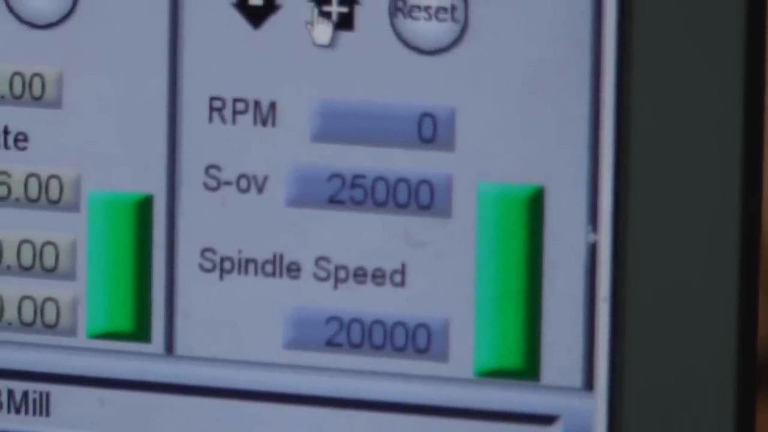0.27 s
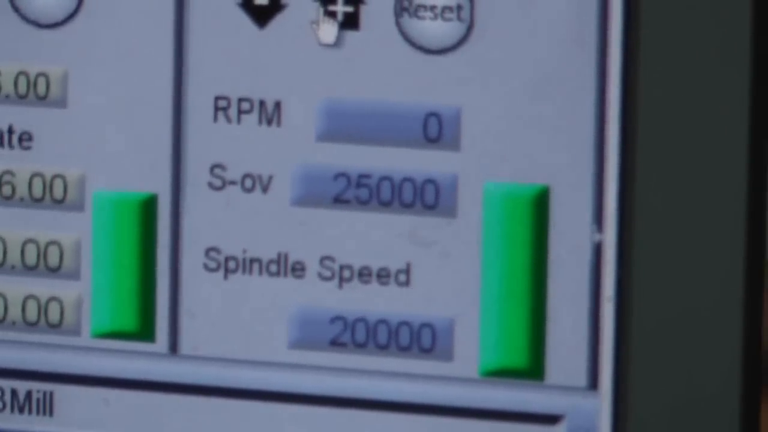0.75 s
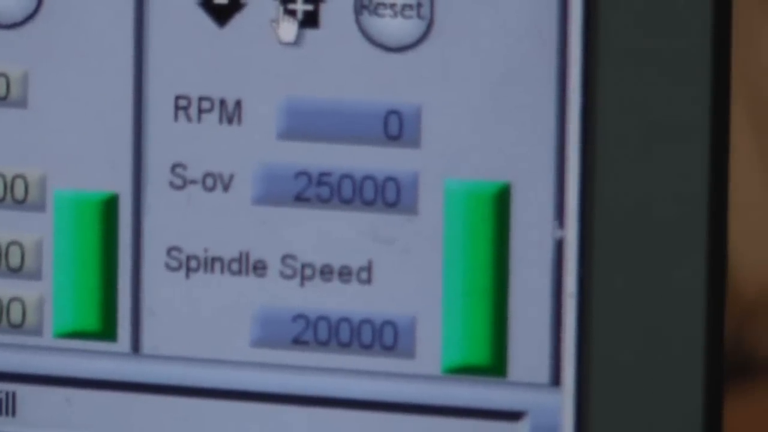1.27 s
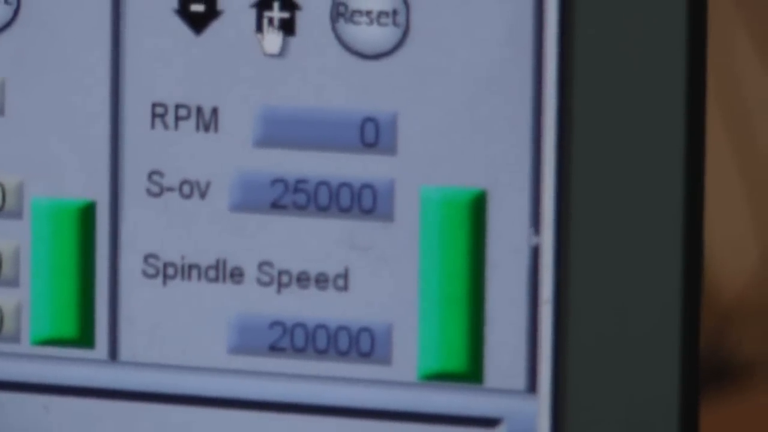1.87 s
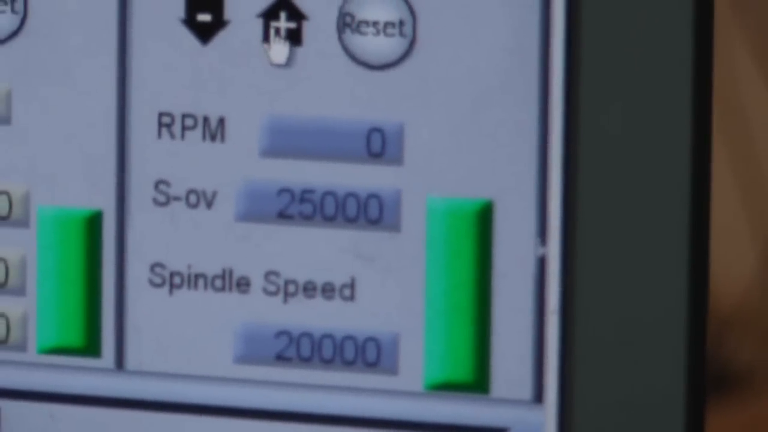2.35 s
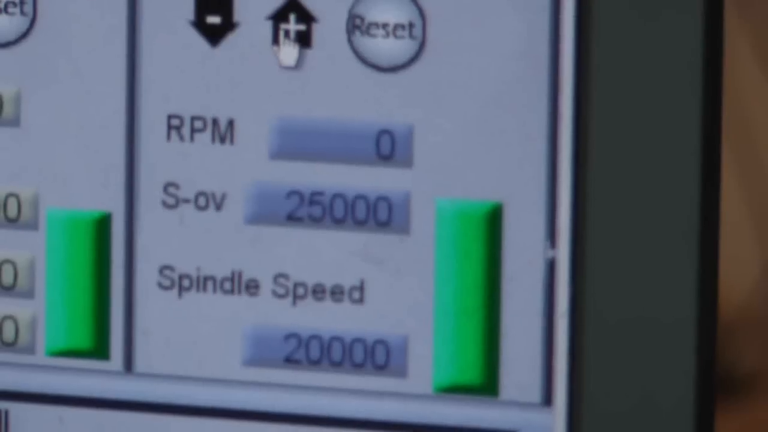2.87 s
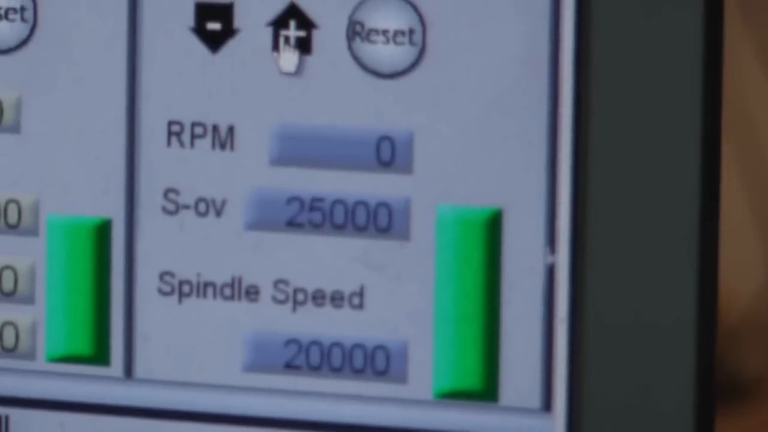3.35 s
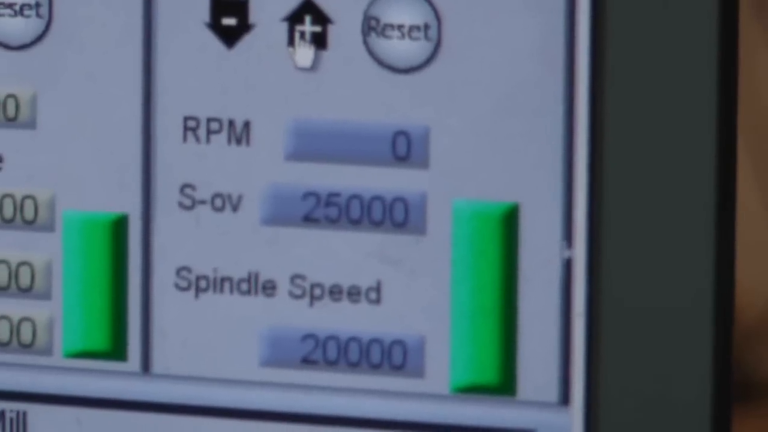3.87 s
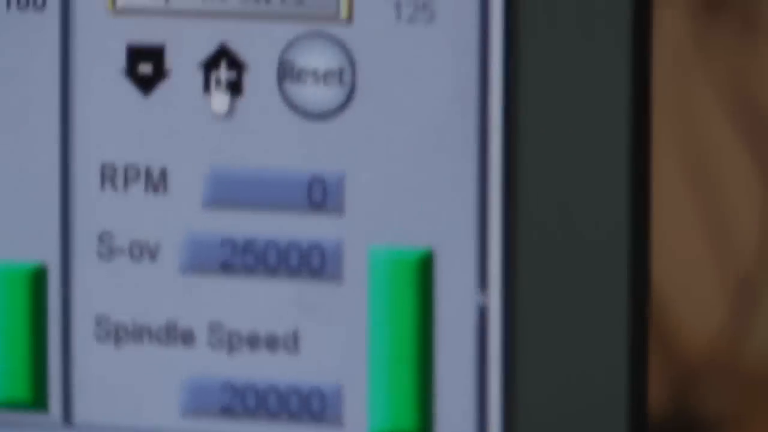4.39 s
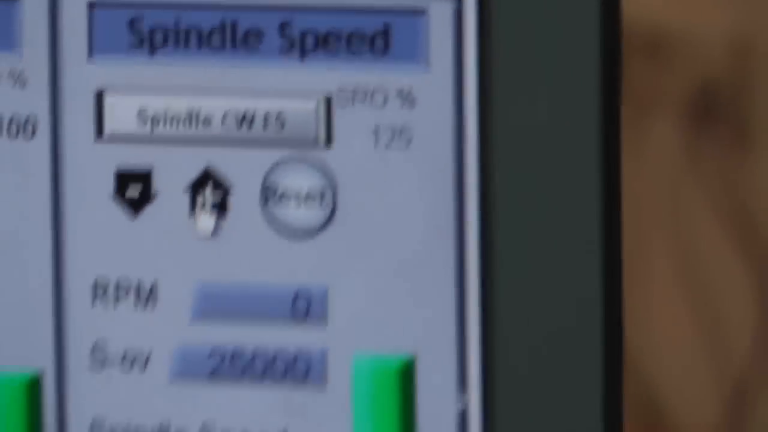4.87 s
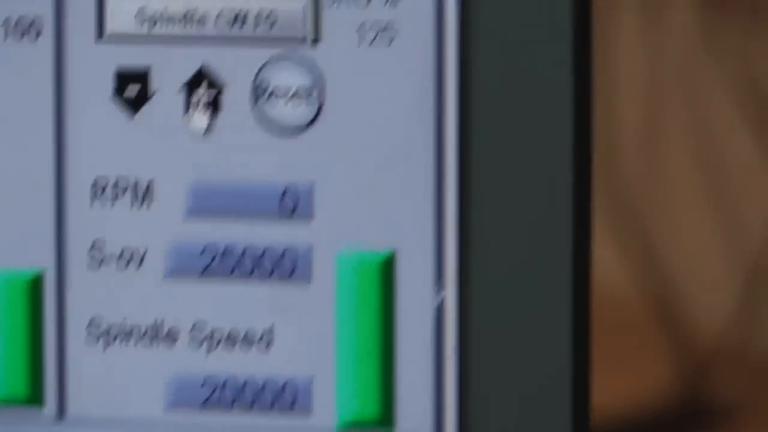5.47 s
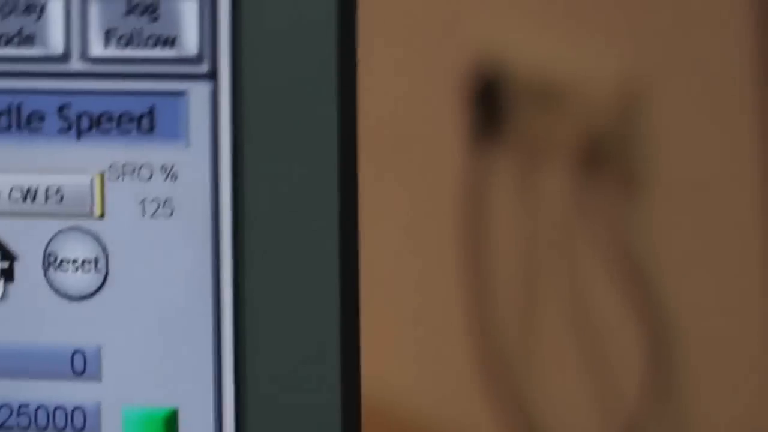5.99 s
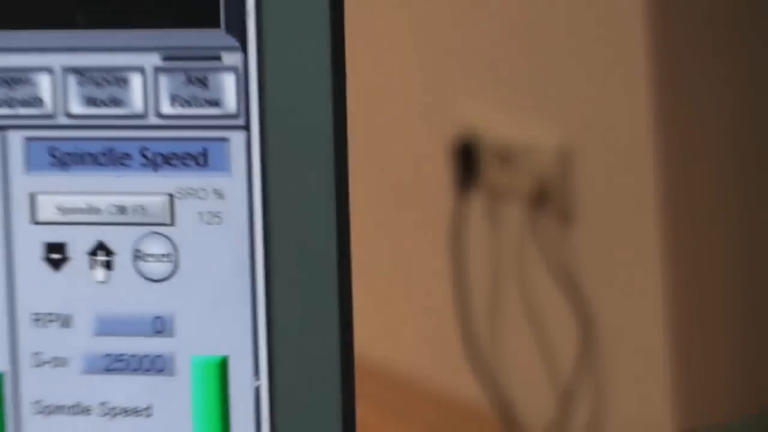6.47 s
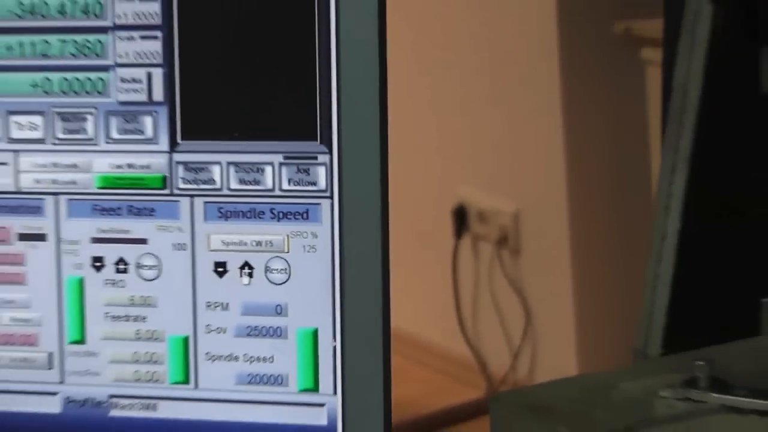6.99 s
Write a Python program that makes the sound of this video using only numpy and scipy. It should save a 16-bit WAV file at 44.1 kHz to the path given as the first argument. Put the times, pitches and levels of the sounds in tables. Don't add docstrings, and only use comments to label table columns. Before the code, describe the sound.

A fast router spindle whines upward in pitch for three seconds, then holds a steady, slowly throbbing whine over airy hiss and faint workshop rumble.

```python
import sys
import numpy as np
from scipy import signal
from scipy.fft import rfft, irfft
from scipy.io import wavfile
from scipy.ndimage import uniform_filter1d, map_coordinates

SR = 44100
rng = np.random.default_rng(int(sys.argv[2]) if len(sys.argv) > 2 else 0)


def rack_gain(trim_db):
    fader = np.asarray(trim_db, float)
    return 10 ** (fader / 20)


def master_out(mix):
    frames = np.transpose(np.atleast_2d(mix))
    ceiling = np.clip(frames, -1, 1)
    pcm = np.round(ceiling * 32767).astype(np.int16)
    wavfile.write(sys.argv[1], SR, pcm)


N = 318842
TIME = np.arange(N) / SR

# time_s, turns_hz
SPEED = [
    (0, 333.1),
    (3.22, 397.2),
    (3.4, 399.3),
    (5, 399.1),
    (6.2, 399.4),
    (7.3, 399.3),
]
# pitch_hz, likeness (1 = same), left_right_db
PORTS = [(35, -.6, -1), (90, 0.56, -1), (200, 0.76, -2), (514, 1, -11), (1460, 0.76, -5.5),
         (3420, 0.96, -3), (5960, 0.9, 1), (9100, 0.93, -1.5), (11800, 0.9, -0.5), (15000, 0.7, -4.5)]


def motor(shaft):
    # time_s, shaft_db, field_relative_to_shaft_db, left_right_db
    twice = [(0, -50.5, 3.5, -4), (.4, -39, -13, -5), (.9, -41.5, 1, -5), (1.3, -33.5, -13, -5),
             (1.55, -33.5, -8, 5), (1.85, -28, -7, 4), (2.3, -39.5, -5, -7.5), (2.6, -33.5, -5.5, 6),
             (2.9, -32.5, -8, -17.5), (3.3, -26, 2, -5.5), (3.9, -22.5, -7, -4.5), (4.7, -24, -8, -4),
             (5.5, -20, -5.5, -2.5), (6.3, -23.5, -5.5, -1), (7.23, -22, -8.5, 0.5)]
    # shaft_multiple, slow_db, full_speed_db
    shaft_lines = [(3, -39, -42), (4, -40, -39), (5, -43, -54), (6, -57, -53), (7, -58, -55), (9, -61, -41),
                   (16, -35, -44), (18, -46, -49), (19, -51, -55), (25, -54, -55), (34, -49, -55)]
    # field_multiple, slow_db, full_speed_db
    field_lines = [(11, -34, -32), (13, -35, -39), (14, -40, -47), (15, -48, -51), (17, -44, -52),
                   (19, -55, -57), (20, -45, -53), (22, -37, -52), (23, -51, -60), (24, -45, -56),
                   (25, -52, -54), (26, -43, -50), (27, -54, -57), (28, -43, -58), (29, -58, -53),
                   (30, -55, -64), (31, -53, -54), (32, -49, -61), (33, -55, -62), (35, -51, -57),
                   (37, -55, -72), (39, -51, -66), (40, -57, -66), (41, -52, -71), (43, -61, -62),
                   (45, -52, -60)]
    slotted = (25, 28)

    slip = slipping()
    field = shaft + slip
    lag = np.array([[-.25], [.25]])
    shaft_db, field_db, pan_db = curves(twice)
    beat = np.sin(4 * np.pi * shaft + .3 * lag) - rack_gain(field_db) * np.sin(4 * np.pi * field)
    out = np.sqrt(2) * (unbalance(shaft) + rack_gain(shaft_db) * sides(pan_db) * beat)

    def beads(multiple):
        twin = .65 if multiple in slotted else .25
        return 1 + twin * np.cos(2 * np.pi * (multiple * slip + rng.random()))

    for multiple, *ends_db in shaft_lines:
        whine = line(multiple * shaft, ends_db, fade_db=2.5, rough=0.073)
        out += rack_gain(0.05) * beads(multiple) * whine
    for multiple, *ends_db in field_lines:
        whine = line(multiple * field, ends_db, fade_db=2.6, rough=.12)
        out += rack_gain(0.3) * beads(multiple) * whine
    return out


def unbalance(shaft):
    # pitch_hz, width_hz, left and right strength_thousandths (sign = polarity)
    room_waves = [(335.79, 3.99, -28.2, -28.7), (343.34, 3.2, 20.3, 64.6), (345.45, 9.33, -76.0, -171.4),
                  (349.81, 3.56, -90.5, -140.3), (350.21, 20.4, 120.1, 215.6),
                  (354.05, 5.69, -122.7, -198.6), (358.74, 1.87, 8.6, -28.4), (364.53, 3.22, 36.1, 44.3),
                  (378.78, 5.11, 146.9, 283.0), (378.78, 12.18, -137.4, -248.3),
                  (383.76, 5.25, 35.7, 112.9), (396.14, 3.77, -27.4, -61.1), (399.39, 3.11, 22.6, 41.1)]
    # time_s, gain_db, left_right_shift_db
    aim = [
        (3.3, 0, 0),
        (3.6, 0, .6),
        (4.6, .4, 1.4),
        (5, -.9, 2.4),
        (5.4, .5, 2.8),
        (6.2, 6, 3.4),
        (6.6, 6.9, 3),
        (7.23, 7.2, 2.8),
    ]
    f = np.minimum(curves(SPEED)[0], 399.1)
    room = 0
    for hz, width, left, right in room_waves:
        response = 1j * f * width / (hz * hz - f * f + 1j * f * width)
        room = room + np.outer([left, right], response)
    gain_db, pan_db = curves(aim)
    return rack_gain(gain_db - 60.5) * sides(pan_db) * np.imag(room * np.exp(2j * np.pi * shaft))


def slipping():
    start_turns, climbing_hz, held_hz, load_off_s = .338, 1.016, .619, 3.11
    climbing = climbing_hz * np.minimum(TIME, load_off_s)
    return start_turns + climbing + held_hz * np.maximum(TIME - load_off_s, 0)


def bearings(shaft):
    # ball_pass_multiple, added_shaft_multiple, slow_db, full_speed_db
    ball_lines = [(1, -2, -54, -46), (1, -1, -48, -51), (1, 0, -47, -38), (1, 1, -40, -59),
                  (1, 2, -61, -54), (1, 3, -67, -49), (-1, 6, -58, -72), (-1, 7, -41, -61),
                  (-1, 8, -46, -46), (-1, 9, -41, -58), (-1, 10, -52, -60), (-1, 12, -62, -54),
                  (2, 0, -52, -41), (2, 1, -54, -56), (2, 2, -43, -39), (2, 3, -46, -43), (1, 5, -63, -41),
                  (1, 6, -55, -38), (3, -1, -48, -41), (3, 0, -31, -34), (3, 1, -44, -49), (5, 0, -48, -41),
                  (6, 0, -52, -54), (7, 0, -60, -53), (8, 0, -55, -48), (4, 0, -58, -53), (5, 1, -53, -54),
                  (6, -1, -59, -59), (9, 0, -55, -64)]
    # shaft_multiple, slow_db, full_speed_db
    cage_lines = [(.41, -53, -70), (2.66, -48, -68), (2.96, -42, -68), (3.67, -65, -48), (4.34, -60, -52),
                  (4.79, -44, -64), (9.81, -50, -43), (17.71, -60, -57), (18.72, -52, -56),
                  (19.5, -57, -54), (31.52, -58, -52)]
    balls_per_turn = 4.0975
    balls = balls_per_turn * shaft + .8 * np.cumsum(wobble(30)) / SR
    race = sum(line(m * balls + n * shaft, ends_db, fade_db=4.5, rough=0.24)
               for m, n, *ends_db in ball_lines)
    cage = sum(line(k * shaft, ends_db, fade_db=3.0, rough=0.09) for k, *ends_db in cage_lines)
    return rack_gain(-0.75) * race + rack_gain(-1.5) * cage


def line(turns, ends_db, fade_db, rough):
    hz = turns[-1] / TIME[-1]
    apart = 1 - np.clip(along(PORTS, hz), 0, 1)
    sweeping = np.interp(TIME, [3.2, 3.5], [.95, .55])
    level_db = strength(hz / curves(SPEED)[0].mean(), *ends_db) + fade_db * sweeping * wobble(5)
    skirt = 1 + rough * wobble(70)
    lag = 3.5 * apart * wobble(1.414)
    pan_db = along(PORTS, hz, col=2) + 16 * apart * wobble(3.26)
    phase = 2 * np.pi * (turns + rng.random())
    tone = np.sin([phase - lag / 2, phase + lag / 2])
    return np.sqrt(2) * rack_gain(level_db) * skirt * sides(pan_db) * tone


def strength(multiple, slow_db, full_db):
    # pitch_hz, width_hz, gain_db
    housing = [(156.8, 13, 11), (3029, 184, 14), (3700, 110, -5.5), (4020, 74, -14), (4130, 220, -12),
               (4570, 64, -9), (4940, 120, -11.5), (5660, 98, 4.5), (6530, 470, -4), (7300, 67, 6),
               (7780, 180, 4.5), (9300, 430, 4), (11950, 480, 8.5), (13300, 220, -4)]
    slow_hz, full_hz = 333.1, 399.3
    away_s, away_db_per_s = 3, -0.7
    s = np.arange(0, TIME[-1] + .02, .01)
    speed = np.interp(s, *np.transpose(SPEED))
    db = np.interp(speed, [slow_hz, full_hz], [slow_db, full_db])
    db += away_db_per_s * np.maximum(s - away_s, 0)
    for hz, width, gain_db in housing:
        db += gain_db / (1 + (2 * (multiple * speed - hz) / width) ** 2)
    return np.interp(TIME, s, db)


def hiss(shaft):
    # pitch_hz, level_db_per_hz
    climb = [(700, -55), (950, -7), (1200, -31), (1450, -8.5), (1700, -3), (2000, -29), (2350, -27),
             (2990, -2.5), (4340, 2), (5130, -17.5), (7900, -7), (8910, -13), (12200, -12.5), (15800, -20)]
    # pitch_hz, level_db_per_hz
    hold = [(700, -46), (1050, -14.5), (1200, -67), (1300, -18), (1600, -5), (2240, -22), (3170, -3),
            (4440, -3), (4900, -8), (6500, -17.5), (8150, -6), (8700, -12.5), (12800, -10), (15800, -20.5)]
    settled = np.clip((TIME - .8) / 3.4, 0, 1) * np.pi / 2
    air = np.cos(settled) * rack_gain(8.5) * rush(climb, patchy_db=1.96)
    air += np.sin(settled) * rack_gain(6) * rush(hold, patchy_db=1.3)
    held_s = np.maximum(TIME - 3.11, 0)
    pump_depth_db = 0.96 * np.minimum(held_s, 1) + 0.07 * held_s
    pump_db = pump_depth_db * np.cos(4 * np.pi * slipping())
    throb = 1 + 0.23 * np.sin(2 * np.pi * shaft)
    return rack_gain(-34.5 + pump_db + 0.072 * wobble(7)) * throb * air


def workshop():
    # pitch_hz, level_db_per_hz
    shop = [(15, -35), (30, -12), (70, -22), (200, -5), (300, -16.5), (450, -4), (700, -2), (900, -3),
            (1100, -16), (1500, -56)]
    mains_hz = 99.9
    lag = np.array([[-.4], [.4]])
    tone = np.sin(2 * np.pi * mains_hz * TIME + lag)
    hum = np.sqrt(2) * rack_gain(-60.5 + 1.5 * wobble(5.9)) * sides(-2.3)[:, None] * tone
    drone_db = np.interp(TIME, [0, 2.2, 3.2], [-49.5, -50, -49])
    return hum + rack_gain(drone_db) * rush(shop, patchy_db=2.0)


def rush(spectrum, patchy_db):
    z = signal.stft(rng.standard_normal((2, N + 8192)), nperseg=512)[2]
    patches = uniform_filter1d(rng.standard_normal(z.shape[1:]), size=5, axis=0)
    patches = uniform_filter1d(patches, size=12, axis=1)
    pair = signal.istft(z * rack_gain(patchy_db * patches / patches.std()), nperseg=512)[1]
    hz = np.fft.rfftfreq(pair.shape[1], 1 / SR)
    turn = np.arccos(np.clip(along(PORTS, hz), -1, 1)) / 2
    ripple_db = 2.2 * np.interp(hz / 45, np.arange(600), rng.standard_normal(600))
    colour = rack_gain(along(spectrum, hz) + ripple_db)
    mid, side = rfft(pair) * colour * [np.cos(turn), np.sin(turn)]
    both = [mid + side, mid - side] * sides(along(PORTS, hz, col=2))
    out = irfft(both, pair.shape[1])[:, :N]
    return out / np.std(out.mean(axis=0))


def along(points, hz, col=1):
    table = np.transpose(points)
    return np.interp(np.log(hz + 1), np.log(table[0] + 1), table[col])


def curves(rows):
    s, *cols = np.transpose(rows)
    return [np.interp(TIME, s, c) for c in cols]


def wobble(rate):
    return map_coordinates(rng.standard_normal(int(N * rate / SR) + 4), [TIME * rate], order=1)


def sides(pan_db):
    return np.array([rack_gain(pan_db / 2), rack_gain(-pan_db / 2)])


def scene():
    shaft = np.cumsum(curves(SPEED)[0]) / SR
    return motor(shaft) + bearings(shaft) + hiss(shaft) + workshop()


def roll_off(x):
    return signal.sosfilt(signal.butter(12, 15730, fs=SR, output="sos"), x)


def record(dry):
    keep = np.exp(-1 / (.1 * SR))
    power = np.mean(dry ** 2, axis=0)
    start = keep * power[:SR // 10].mean()
    heard = signal.lfilter([1 - keep], [1, -keep], power, zi=[start])[0]
    gain = (heard / rack_gain(-20.0) ** 2) ** -.22
    return roll_off(dry * gain)


dry = scene()
out = record(dry)
master_out(out)
```